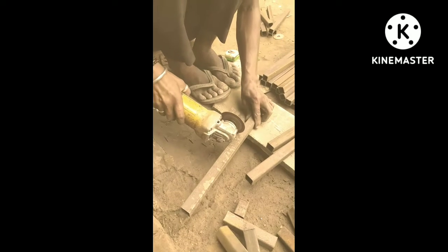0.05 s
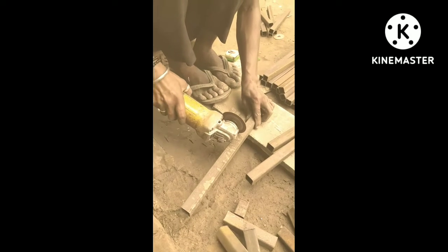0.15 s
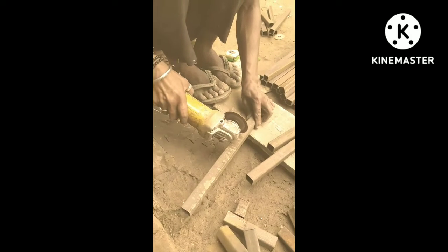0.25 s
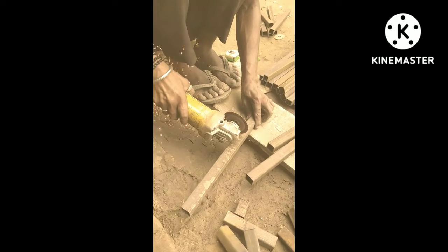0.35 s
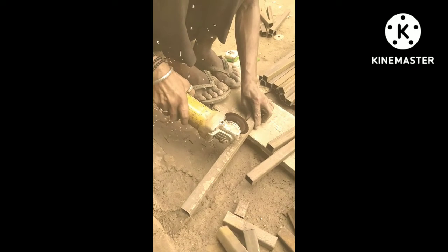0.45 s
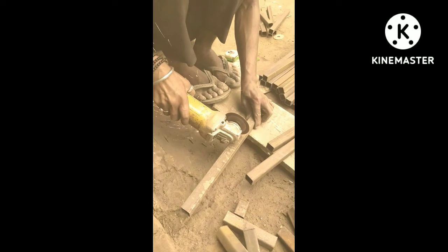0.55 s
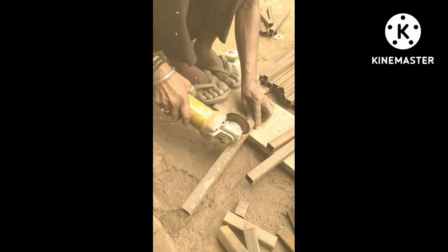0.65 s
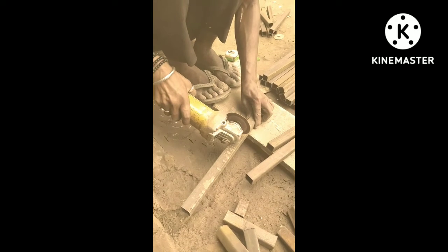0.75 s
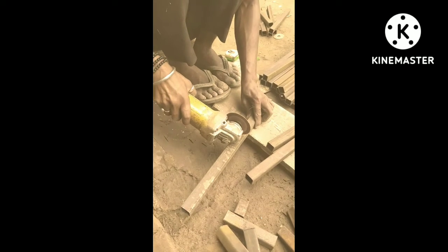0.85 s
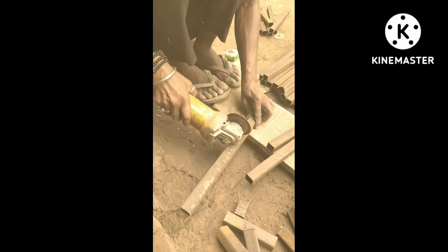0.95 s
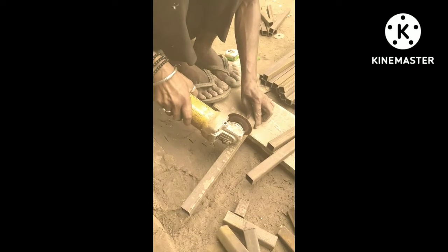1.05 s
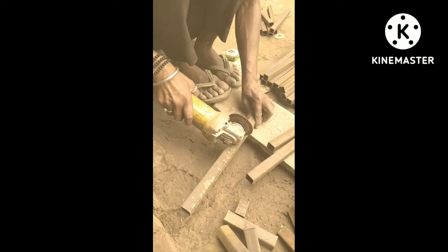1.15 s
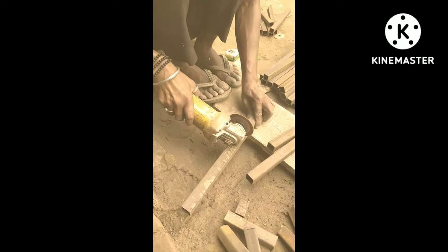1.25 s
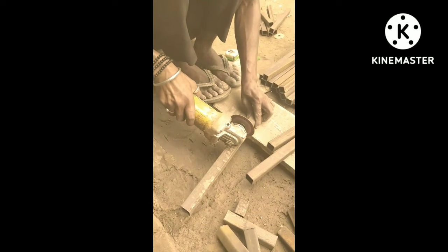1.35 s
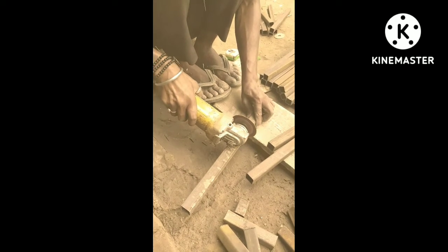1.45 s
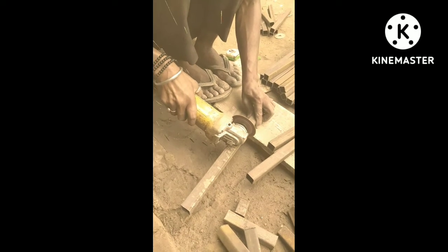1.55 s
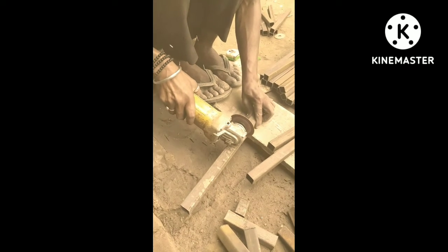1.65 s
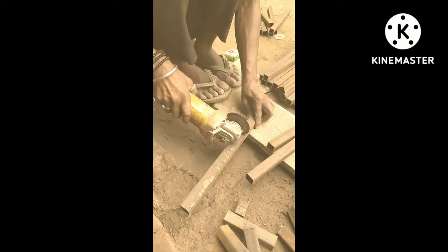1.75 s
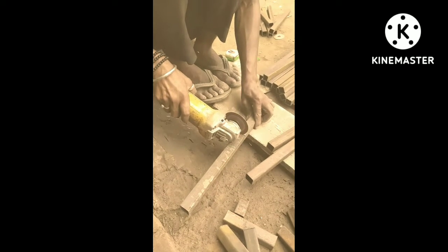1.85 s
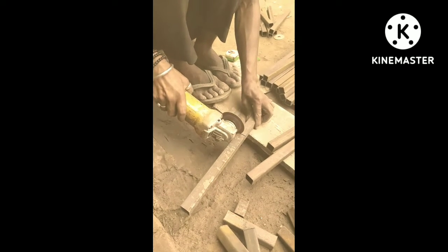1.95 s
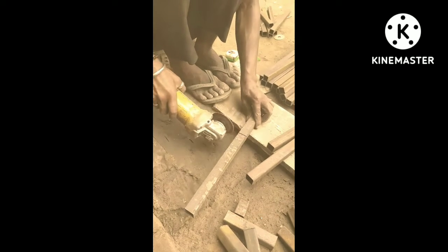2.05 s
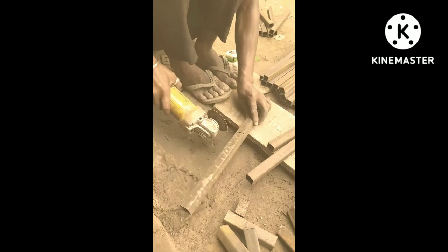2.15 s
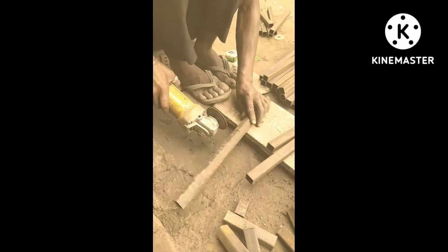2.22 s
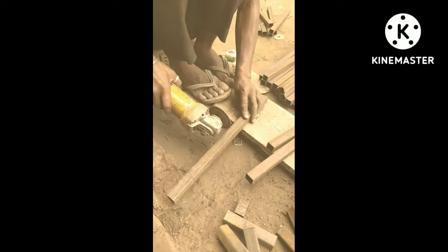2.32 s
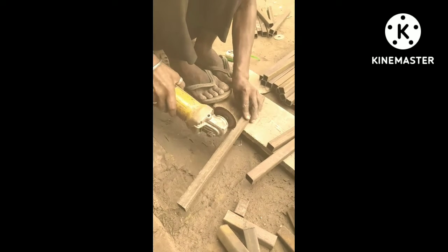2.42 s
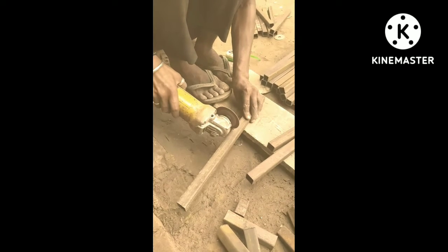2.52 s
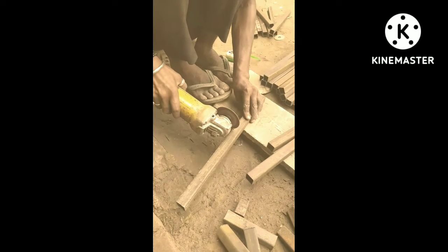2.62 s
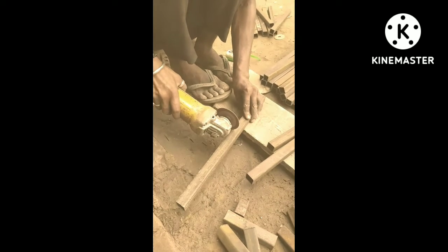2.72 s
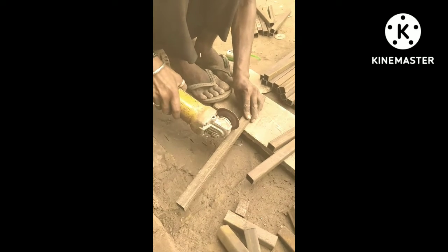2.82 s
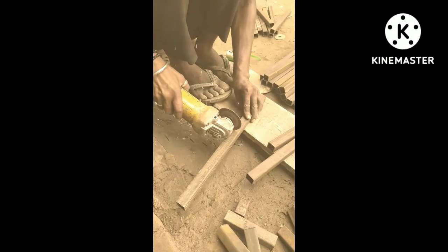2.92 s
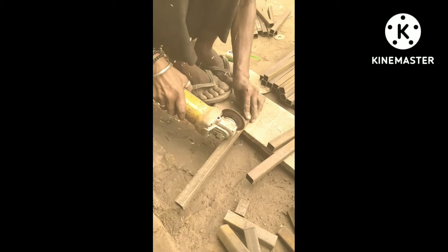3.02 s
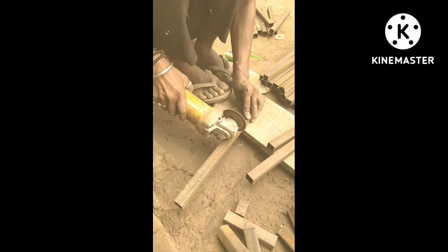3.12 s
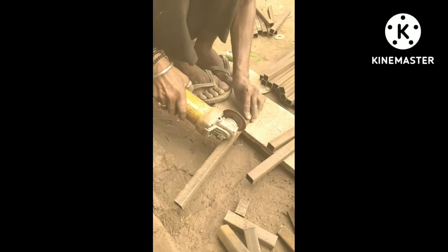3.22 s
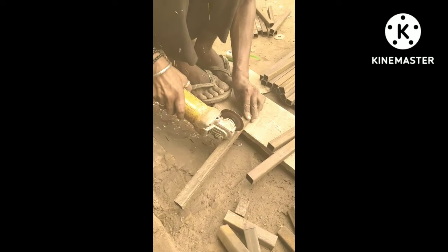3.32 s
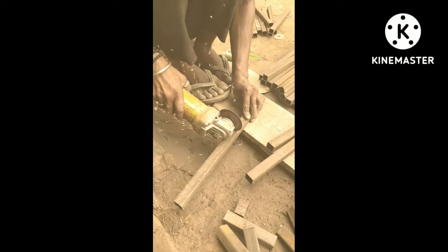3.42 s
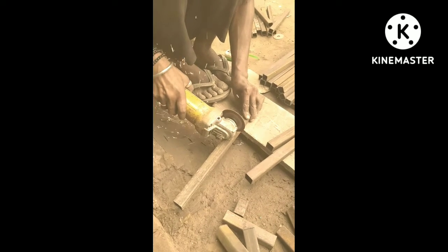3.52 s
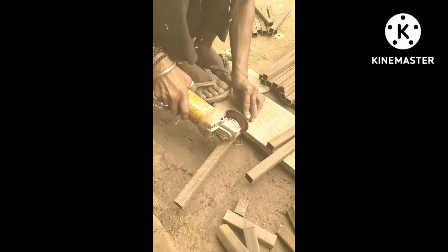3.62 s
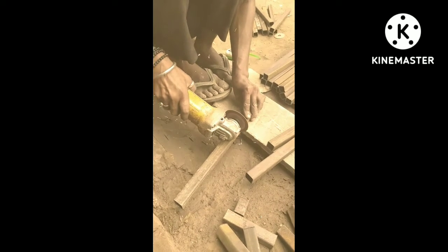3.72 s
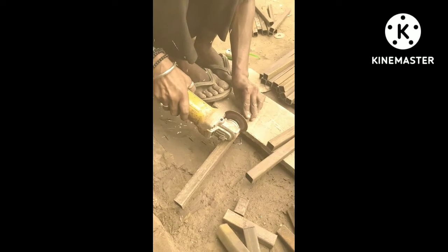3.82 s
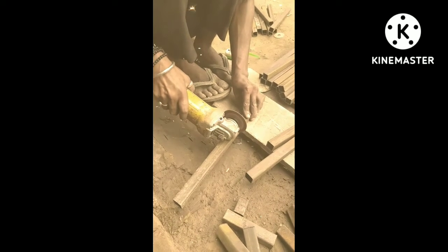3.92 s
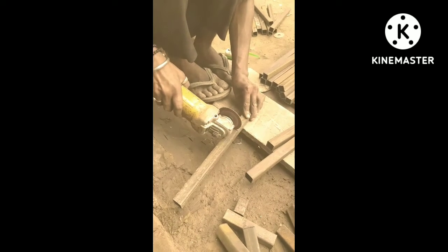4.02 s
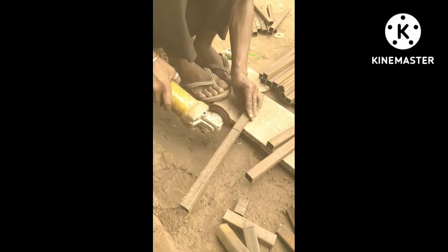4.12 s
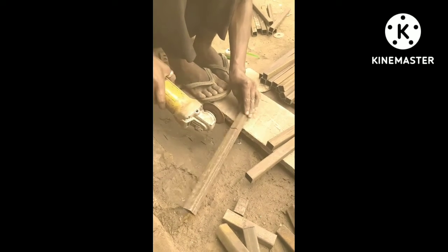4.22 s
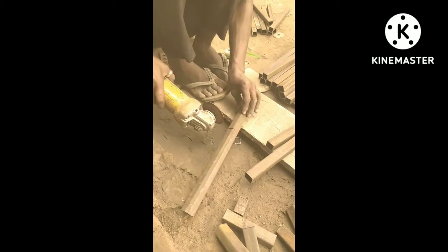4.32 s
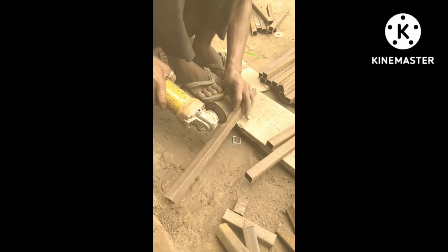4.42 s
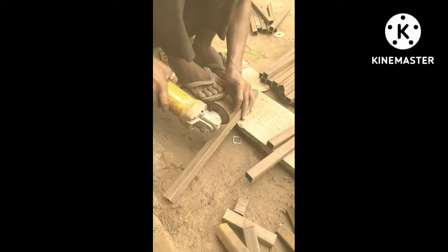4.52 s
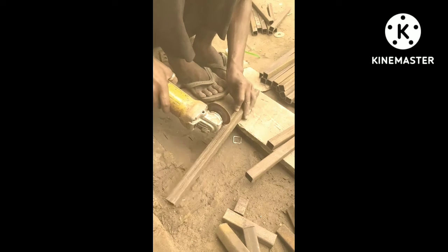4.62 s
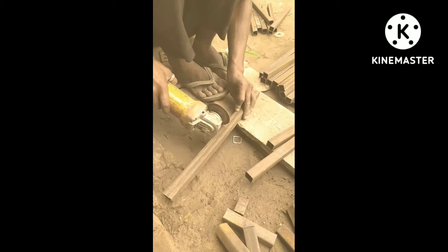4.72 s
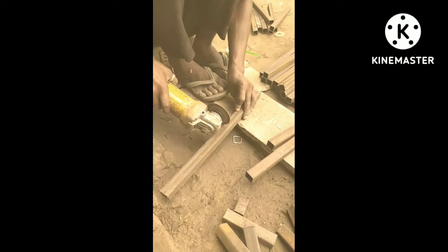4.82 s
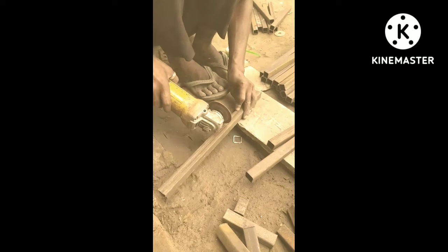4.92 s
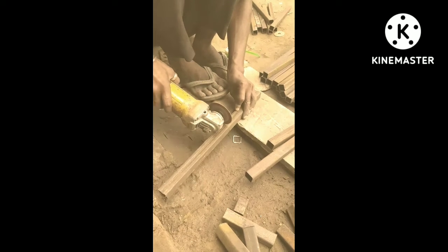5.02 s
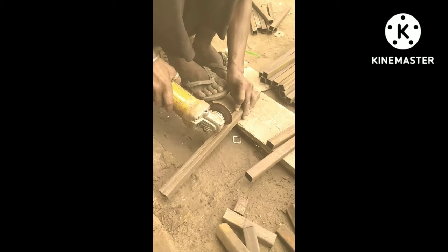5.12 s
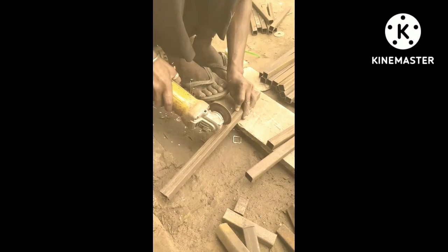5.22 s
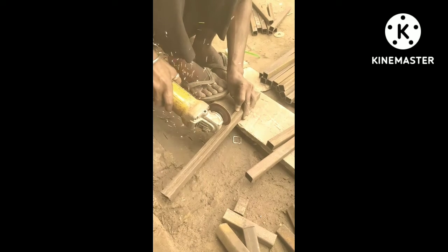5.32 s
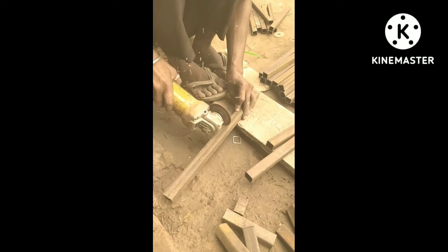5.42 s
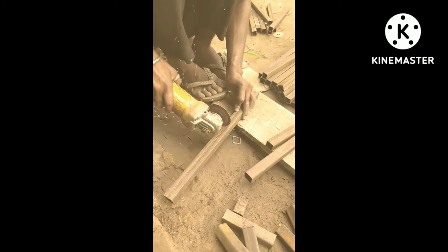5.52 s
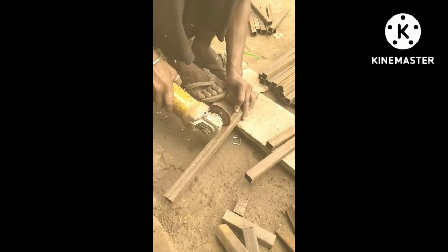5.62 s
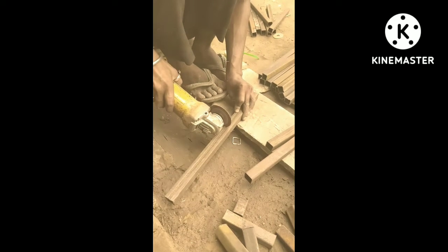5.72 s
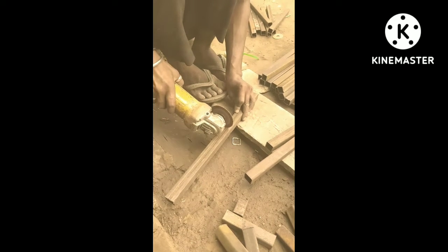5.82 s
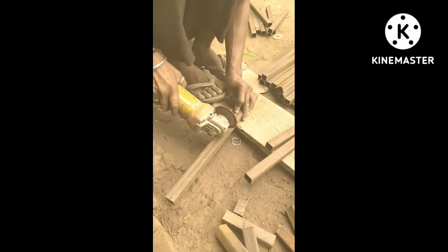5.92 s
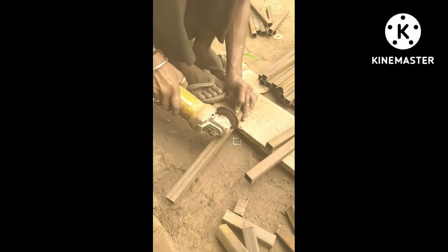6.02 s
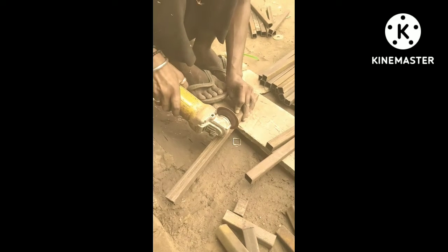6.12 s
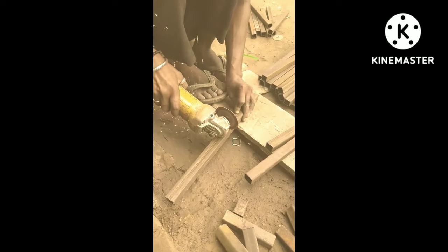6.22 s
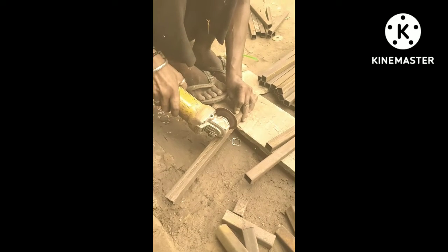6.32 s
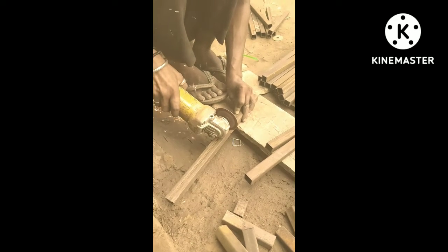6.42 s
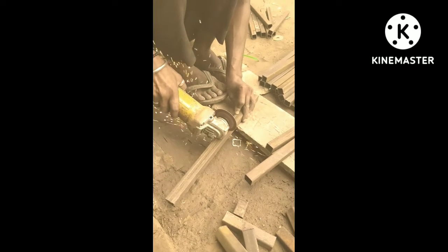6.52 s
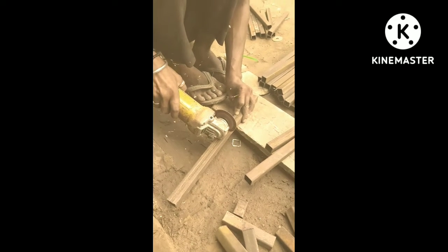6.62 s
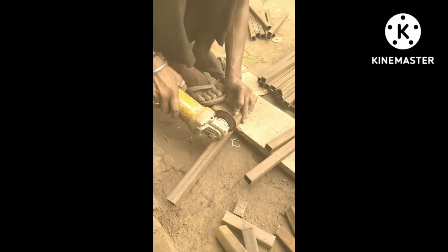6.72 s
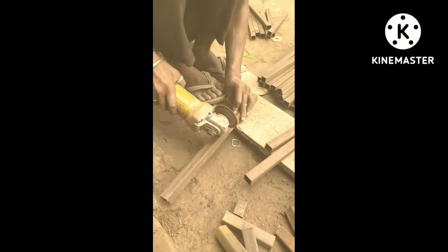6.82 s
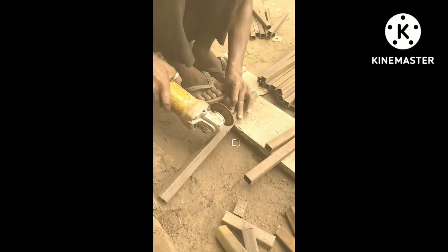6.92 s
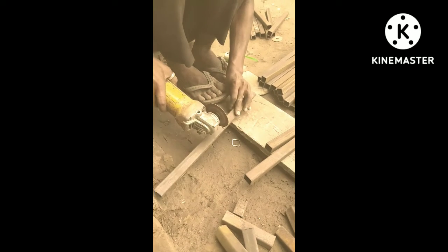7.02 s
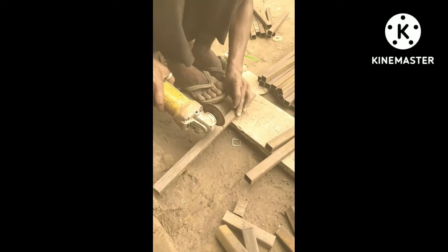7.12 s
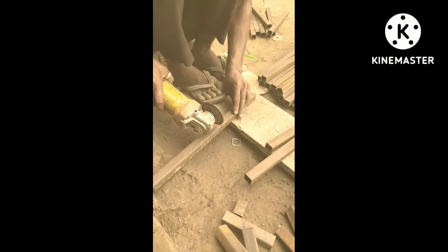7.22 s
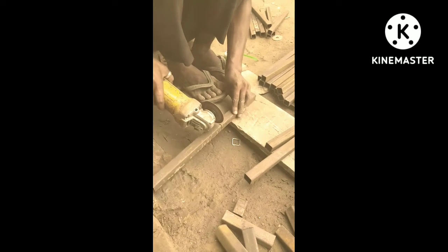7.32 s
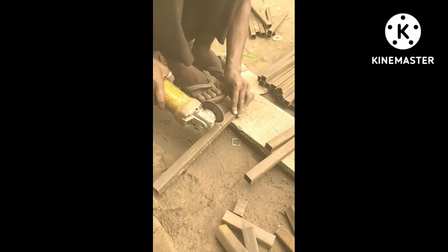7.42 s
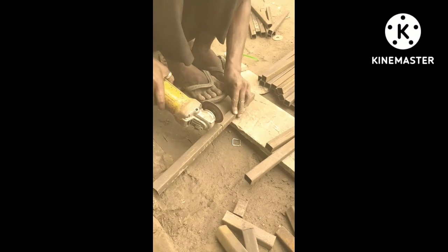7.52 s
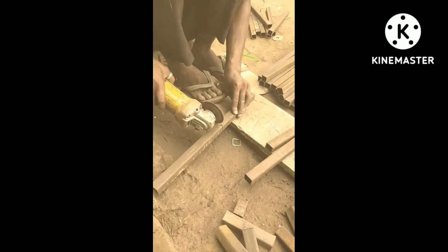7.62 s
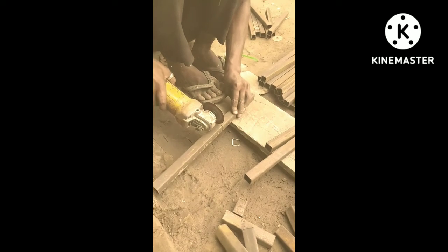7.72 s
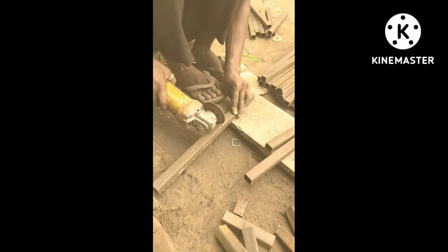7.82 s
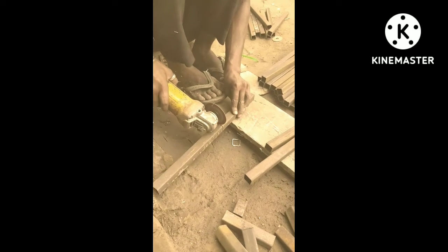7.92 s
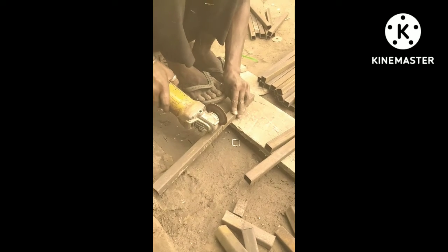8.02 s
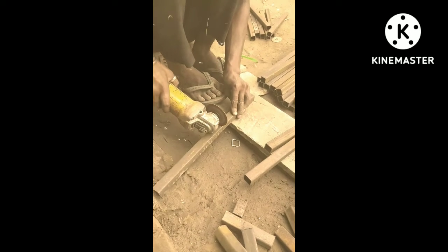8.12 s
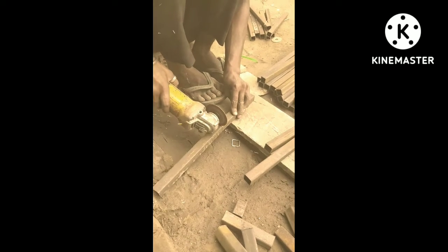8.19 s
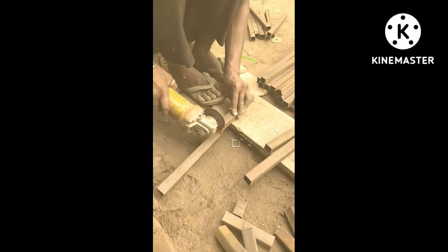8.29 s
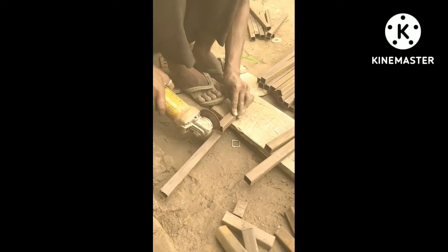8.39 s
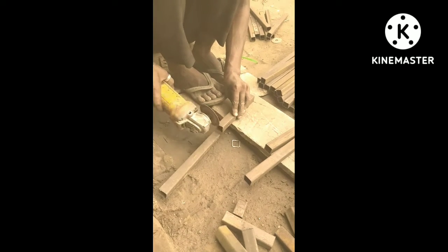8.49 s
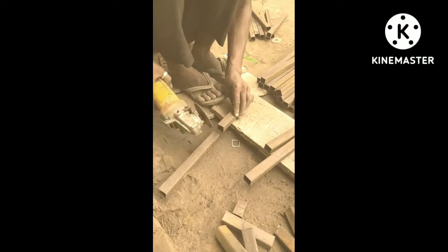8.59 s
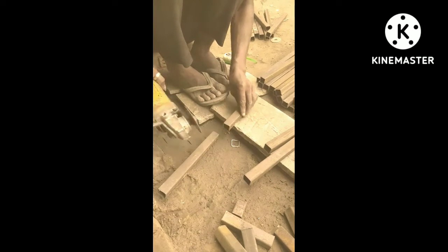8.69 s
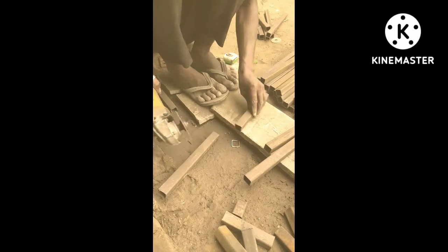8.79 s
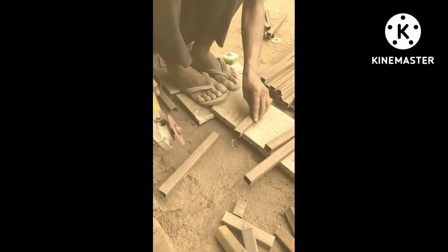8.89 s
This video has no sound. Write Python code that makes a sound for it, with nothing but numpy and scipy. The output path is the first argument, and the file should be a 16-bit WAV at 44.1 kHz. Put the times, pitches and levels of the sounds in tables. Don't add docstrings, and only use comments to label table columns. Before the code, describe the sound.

A handheld angle grinder whirs freely, then bites into a steel tube four times with harsh, squealing, gritty screeches, motor sagging under load, outdoors.

```python
import sys
import numpy as np
from scipy import signal
from scipy.fft import rfft, irfft, next_fast_len
from scipy.io import wavfile
from scipy.ndimage import uniform_filter1d, map_coordinates

SR = 44100
rng = np.random.default_rng(int(sys.argv[2]) if len(sys.argv) > 2 else 0)


def voltage_ratio(level):
    return 10 ** (np.asarray(level, float) / 20)


def pcm_store(signal):
    levels = np.round(np.clip(np.atleast_2d(signal), -1, 1) * 32767)
    wavfile.write(sys.argv[1], SR, levels.astype(np.int16).T)


N = 394694
TIME = np.arange(N) / SR


def unit(x):
    return x / np.sqrt(np.mean(x ** 2) + 1e-20)


def steady(x):
    return x / np.sqrt(np.abs(uniform_filter1d(x ** 2, size=6000)) + 1e-12)


def along(points, hz):
    f, v = np.transpose(points)
    return np.interp(np.log(hz + 1), np.log(f + 1), v)


def over_time(tables):
    s, value = np.transpose(np.concatenate(tables))
    return np.interp(TIME, s, value)


def gate(on, off, edge):
    return np.clip(np.minimum(TIME - on, off - TIME) / edge + .5, 0, 1)


def wobble(rate):
    knots = rng.standard_normal(int(N * rate / SR) + 4)
    return map_coordinates(knots, [np.arange(N) * rate / SR])


def filtered(x, response):
    m = next_fast_len(N + SR // 4)
    return irfft(rfft(x, m) * response(np.fft.rfftfreq(m, 1 / SR)), m)[..., :N]


def coloured(x, spectrum):
    return unit(filtered(x, lambda hz: voltage_ratio(along(spectrum, hz))))


def resonances(modes):
    def response(f):
        total = 0
        for k, (centre, width, db) in enumerate(modes):
            loss = 1j * f * width
            total = total + (-1) ** k * voltage_ratio(db) * loss / (centre * centre - f * f + loss)
        return total
    return response


def patchy(x, depth_db):
    z = signal.stft(x, nperseg=512)[2]
    field = uniform_filter1d(rng.standard_normal(z.shape), size=5, axis=0)
    field = uniform_filter1d(field, size=18, axis=1)
    return signal.istft(z * voltage_ratio(depth_db * unit(field)), nperseg=512)[1][:N]


# start in seconds, end in seconds.
CONTACT = [
    (.075, 2.08),
    (2.755, 4.185),
    (4.855, 5.0),
    (5.075, 6.885),
    (7.628, 8.47),
]


def touching(edge, early=0):
    return sum(gate(on, off - early, edge) for on, off in CONTACT)


# time in seconds, turns per second the load would take off.
DRAG = [
    [(.075, 0), (.3, 19.2), (.65, 59.5), (1.05, 67.7), (1.45, 66.4), (1.7, 46.5), (1.85, 8.7), (2.08, 0)],
    [(2.755, 0), (3, 26.5), (3.25, 52.3), (3.6, 50.3), (3.95, 54), (4.16, 0)],
    [(4.855, 0), (5.075, 7.7), (5.4, 33), (5.75, 13.8), (6.05, 27.8), (6.35, 67), (6.65, 42.5), (6.87, 0)],
    [(7.628, 0), (7.9, 33.5), (8.15, 58.3), (8.3, 40.5), (8.46, 0)],
]


def drag():
    return over_time(DRAG)


FREE_TURNS, LAG_S = 202.4, .51


def speed():
    keep = np.exp(-1 / (LAG_S * SR))
    return FREE_TURNS - signal.lfilter([1 - keep], [1, -keep], drag())


def turns():
    return np.cumsum(speed()) / SR


def rim(angle, wear_turns):
    cells = 192
    profile = irfft(np.exp(2j * np.pi * rng.random((400, cells // 2 + 1))), cells)
    wrapped = np.concatenate([profile, profile[:, :8]], axis=1)
    worn = np.minimum(angle / wear_turns, 398)
    return unit(map_coordinates(wrapped, [worn, 4 + angle % 1 * cells]))


# frequency in Hz, level in dB per Hz.
FAN = [(880, -44), (1500, -53), (1650, -19.5), (1920, -3.5), (2370, -1.5), (3090, -0.5), (3870, 0),
       (4480, -5), (6560, -12.5), (7820, -10), (8620, -10.5), (9060, -9), (10100, -23), (12900, -21),
       (15500, -23)]
# frequency in Hz, width in Hz, level in dB over the rush.
HOUSING = [(2400, 300, -3), (3080, 330, -1), (4450, 300, -5), (5400, 500, -3), (8300, 300, -4)]
# frequency in Hz, width in Hz, level in dB over the rush.
LIFTED = [(3770, 820, 2), (4970, 260, 4.5)]


def fan_rush(angle):
    gusts = rng.standard_normal(N) * voltage_ratio(0.64 * wobble(40))
    air = coloured(gusts + 0.17 * rim(angle, wear_turns=6), FAN)
    aside = gate(8.42, 10, edge=0.8)
    boost = lambda modes: filtered(air, lambda hz: np.abs(resonances(modes)(hz)))
    rush = air + (1 - aside) * boost(HOUSING) + aside * boost(LIFTED)
    return unit(patchy(rush, depth_db=1.2))


# frequency in Hz, level in dB per Hz.
CASING = [(24, -65), (40, -35), (130, -13.5), (223, -15), (422, -12), (488, -15), (609, -7), (838, -7),
          (1230, -11), (1800, -10), (2340, -5.5), (3960, -120)]


def casing_hum():
    return voltage_ratio(-19.5) * coloured(rng.standard_normal(N), CASING)


MESH = 46.3
WHINE_DB, WHINE_LOADED, WHINE_TOUCH_DB = -27, 0.27, -4
NOTCH_HZ, NOTCH_WIDTH_HZ, NOTCH_DB = 8440, 120, -7.5


def gear_whine(angle):
    whine_db = WHINE_DB - WHINE_LOADED * drag() + WHINE_TOUCH_DB * touching(edge=0.025) + 1.6 * wobble(35)
    whine_db += NOTCH_DB * np.exp(-((MESH * speed() - NOTCH_HZ) / NOTCH_WIDTH_HZ) ** 2)
    return np.sqrt(2) * voltage_ratio(whine_db) * np.sin(2 * np.pi * MESH * angle + 0.74 * wobble(30))


FAN_DB, FAN_LAW = -24, 39.7


def motor(angle):
    level_db = FAN_DB + FAN_LAW * np.log10(speed() / FREE_TURNS)
    return voltage_ratio(level_db + 7.5) * (fan_rush(angle) + casing_hum()) + gear_whine(angle)


# time in seconds, bite in dB.
BITE = [
    [(.07, -24), (.43, -19), (.77, -15), (1.2, -16.5), (1.36, -20.5), (1.72, -18.5), (1.93, -23),
     (2.05, -33), (2.08, -23.5)],
    [(2.755, -27), (2.95, -16), (3.37, -16.5), (3.7, -17.5), (3.79, -18.5), (4.01, -18.5), (4.137, -22),
     (4.185, -40)],
    [(4.855, -34), (4.967, -22), (5.0, -41)],
    [(5.075, -25), (5.125, -19), (5.39, -17), (5.69, -18.5), (5.84, -25.5), (5.98, -16), (6.25, -19.5),
     (6.8, -19.5), (6.885, -30.5)],
    [(7.628, -29), (7.66, -22.5), (8.0, -16), (8.186, -18), (8.3, -14.5), (8.4, -23.5), (8.454, -18),
     (8.47, -33)],
]
FIRM_DB, LIGHT_DB = -18.5, -22.5


def bite():
    bite_db = over_time(BITE)
    return bite_db - FIRM_DB, np.maximum(LIGHT_DB - bite_db, 0)


# frequency in Hz, level in dB per Hz.
RUB = [(880, -29), (1500, -21.5), (2090, -17), (2310, -8), (2920, -17), (3380, -3), (4200, 1), (4810, -8.5),
       (5910, -15.5), (6460, -8.5), (7340, -11), (8750, -0.5), (10000, -21), (13000, -10.5), (15600, -10)]


def scratching(angle):
    chatter = voltage_ratio(0.64 * wobble(12) + 0.7 * wobble(60))
    profile = unit(patchy(rim(angle, wear_turns=9), depth_db=3.5))
    force = chatter * (profile + .65 * rng.standard_normal(N))
    coarse = filtered(profile, lambda hz: 1.3 / (1 + (hz / 9000) ** 2))
    rub = coloured(chatter * (coarse + .8 * rng.standard_normal(N)), RUB)
    return force, rub


STAGES = [0, .75, 1.25, 2.4, 3.3, 4.5, 5.9, 7.2, 8.4, 9]
# frequency in Hz, width in Hz, level in dB.
TUBE = [
    [(3320, 45, 8), (3980, 140, -6), (6410, 110, -5), (8300, 32, -11)],
    [(3330, 130, 6.5), (4180, 89, 8), (6380, 95, 4.5), (7950, 66, -6)],
    [(2760, 37, -6), (3394, 150, 13), (4380, 56, -1), (6700, 24, 8), (7950, 56, -1)],
    [(3330, 70, 3), (4150, 60, 7.5), (4464, 12, 5), (6820, 86, -1), (8600, 110, -3)],
    [(2620, 110, 0.5), (3360, 130, 9), (4050, 27, 8), (6860, 99, 2), (8700, 84, -4)],
    [(3420, 150, 6), (4090, 17, 4.5), (5460, 41, -0.5), (7280, 120, 4.5), (9180, 37, -5)],
    [(3060, 460, 12), (4090, 130, 19), (5360, 80, 3), (6700, 180, 11.5), (9000, 330, 6.5)],
    [(3220, 41, 6), (5550, 67, 0.5), (7020, 22, -4), (7620, 110, -0.5), (8010, 28, -5)],
    [(3930, 320, -6), (4240, 160, 2)],
]


def tube(force, rub):
    sound = np.zeros(N)
    for modes, on, off in zip(TUBE, STAGES, STAGES[1:]):
        crowd = rng.standard_normal(160)
        ripple = lambda hz: voltage_ratio(2.8 * np.interp(hz / 140, np.arange(160), crowd))
        ring = voltage_ratio(-2.5) * unit(filtered(force, resonances(modes)))
        sound += gate(on, off, edge=0.063) * (ring + unit(filtered(rub, ripple)))
    return sound


# frequency in Hz, width in Hz, level in dB.
WALL = [(3940, 130, 4), (4060, 300, 3)]


def first_touch(force):
    since = TIME - np.transpose(CONTACT)[0][:, None]
    fresh = np.where(since > 0, np.exp(-np.abs(since) / 0.095), 0).sum(axis=0)
    return voltage_ratio(4.5) * fresh * unit(filtered(force, resonances(WALL)))


RING_DB = [
    -11.5,
    -13,
    -15.5,
    -14,
    -14.5,
]
DAMPING, FADING = 0.25, 0.85
HISS_DB, HISS_GROWS, HISS_FADING = -20.5, 0.32, .5


def pressure_levels():
    over_db, short_db = bite()
    free_db = sum(db * gate(on - .02, off + .02, edge=.002) for db, (on, off) in zip(RING_DB, CONTACT))
    ring_db = free_db - DAMPING * (over_db + short_db) - FADING * short_db
    hiss_db = HISS_DB + HISS_GROWS * over_db - HISS_FADING * short_db
    return ring_db, FIRM_DB + over_db, hiss_db


# start in seconds, end in seconds.
BOUNCE = (2.803, 2.813)


def cut(angle):
    force, rub = scratching(angle)
    sound = tube(force, rub) + first_touch(force)
    low = filtered(sound, lambda hz: 1 / (1 + (hz / 5700) ** 24))
    hiss = filtered(sound, lambda hz: 1 - 1 / (1 + (hz / 10000) ** 24))
    upper = sound - low - hiss
    spit = voltage_ratio(0.91 * wobble(45))
    hiss = spit * patchy(hiss, depth_db=2.5)
    low_db, upper_db, hiss_db = pressure_levels()
    mixed = voltage_ratio(low_db - 1.0) * steady(low) + voltage_ratio(upper_db - 1.0) * steady(upper)
    mixed += voltage_ratio(hiss_db + 3.1) * steady(hiss)
    return (touching(edge=.002) - 0.91 * gate(*BOUNCE, edge=.004)) * mixed


# frequency in Hz, level in dB per Hz.
PATTER = [(15, -48), (25, -16), (76, -3.5), (171, -8), (366, 0), (400, -5), (512, 0), (1130, -1.5),
          (1700, -2), (2210, 1.5), (3740, -120)]


def patter(clumps):
    sizes_db = np.minimum(3.5 * rng.exponential(size=N), 12)
    grains = (rng.random(N) < 900 / SR) * rng.standard_normal(N) * voltage_ratio(sizes_db)
    dust = 0.15 * rng.standard_normal(N)
    return coloured((grains + dust) * voltage_ratio(1.36 * clumps), PATTER)


# frequency in Hz, level in dB per Hz.
THUDS = [(20, -40), (60, -4.5), (170, 0), (330, -4.5), (600, -9.5), (1200, -57)]


def puffs(clumps):
    pushes = rng.standard_normal(N) * (.06 + (rng.random(N) < 350 / SR))
    return coloured(pushes * voltage_ratio(3.5 * clumps), THUDS)


# middle in seconds, length in seconds, level in dB.
SHOWERS = [(0.507, .1, -29), (.75, 0.17, -22.5), (0.973, 0.16, -20.5), (1.174, 0.24, -24),
           (1.577, 0.19, -22.5), (1.78, 0.024, -26.5), (2.998, 0.047, -19), (3.128, 0.15, -22),
           (3.39, 0.057, -17.5), (3.532, 0.049, -19), (3.646, 0.023, -23), (4.015, 0.054, -25.5),
           (5.362, 0.018, -21.5), (5.502, 0.074, -25.5), (6.017, 0.035, -24.5), (6.563, 0.05, -31.5),
           (6.667, 0.025, -27.5), (7.845, .03, -29), (8.002, 0.046, -19), (8.12, .05, -27.5),
           (8.284, 0.016, -22)]
SWEEP_DB_PER_S = 160
STRAY_DB, STRAY_GROWS = -35.5, 1.8


def grit():
    grit_db = STRAY_DB + STRAY_GROWS * bite()[0]
    for s, length, db in SHOWERS:
        outside = np.maximum(np.abs(TIME - s) - length / 2, 0)
        grit_db = np.maximum(grit_db, db - SWEEP_DB_PER_S * outside)
    patter_db = -29.5 + 0.65 * (grit_db + 30)
    clumps = wobble(45)
    hits = voltage_ratio(patter_db) * steady(patter(clumps)) + voltage_ratio(grit_db - 4.5) * steady(puffs(clumps))
    return touching(edge=0.03, early=.05) * hits


# start in seconds, end in seconds, frequency in Hz, level in dB.
SQUEALS = [(.15, 0.336, 3950, -17), (0.223, .58, 3310, -9.5), (.46, .7, 3330, -22), (.55, 1.2, 6400, -33),
           (.76, .87, 7950, -23), (0.833, 1.363, 3325, -18.5), (1.246, 1.75, 2685, -19.5),
           (1.34, 1.485, 4000, -17), (1.566, 1.69, 4340, -22), (1.77, 1.867, 3340, -15),
           (2.88, 3.12, 12000, -24), (2.877, 3.11, 8570, -21), (3.21, 3.534, 4060, -19),
           (3.28, 3.383, 8140, -22), (3.64, 3.92, 3370, -14.5), (5.15, 5.8, 10500, -27),
           (5.28, 5.45, 3380, -21), (5.4, 5.8, 9200, -28), (5.52, 5.64, 7360, -27), (5.18, 5.85, 4060, -20),
           (5.698, 5.964, 3525, -17), (6.163, 6.312, 3140, -19), (6.263, 6.6, 2360, -21),
           (6.33, 6.61, 3320, -19), (7.837, 7.99, 3240, -14), (8.02, 8.258, 3170, -14.5),
           (7.68, 8.37, 9230, -23.5), (7.88, 8.37, 7430, -18), (8.082, 8.31, 2370, -16.5),
           (8.323, 8.45, 4000, -17)]
LOCK_HZ = 110


def squeals(angle):
    out, rate = np.zeros(N), speed()
    flutter, drift = voltage_ratio(1.3 * wobble(30)), .5 * wobble(41.2)
    for on, off, hz, db in SQUEALS:
        span = slice(round(on * SR), round(off * SR))
        swell = np.hanning(span.stop - span.start) ** .35
        lowest, highest = hz // rate[span].max() - 1, hz // rate[span].min() + 3
        harmonic = np.arange(lowest, highest)[:, None]
        near = np.exp(-((harmonic * rate[span] - hz) / LOCK_HZ) ** 2)
        phase = 2 * np.pi * harmonic * angle[span] + np.roll(drift, span.start)[span]
        out[span] += voltage_ratio(db + 3.0) * swell * np.sum(near * np.sin(phase), axis=0)
    return out * flutter


# frequency in Hz, side level in dB.
WIDTH = [(1200, -61), (1800, -11.5), (2400, -22), (3500, -27), (5000, -29), (8000, -34.5), (9000, -14.5),
         (10500, -56)]


def scene():
    angle = turns()
    mid = motor(angle) + cut(angle) + squeals(angle) + grit()
    side = filtered(.5 * mid + np.roll(mid, 700), lambda hz: voltage_ratio(along(WIDTH, hz)))
    return np.array([mid + side, mid - side])


def low_pass(x):
    return signal.sosfilt(signal.butter(12, 15490, fs=SR, output="sos"), x)


def record(dry):
    soft = dry / (1 + np.abs(dry / .86) ** 5) ** (1 / 5)
    mix = filtered(soft, lambda hz: hz < 15490)
    return low_pass(mix)


dry = scene()
out = record(dry)
pcm_store(out)
```